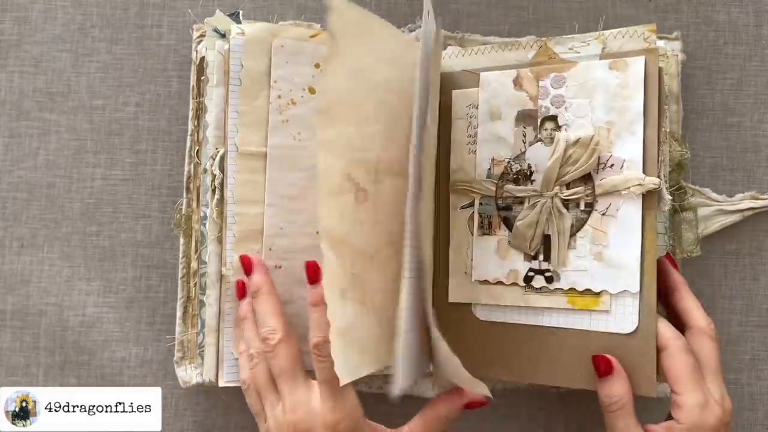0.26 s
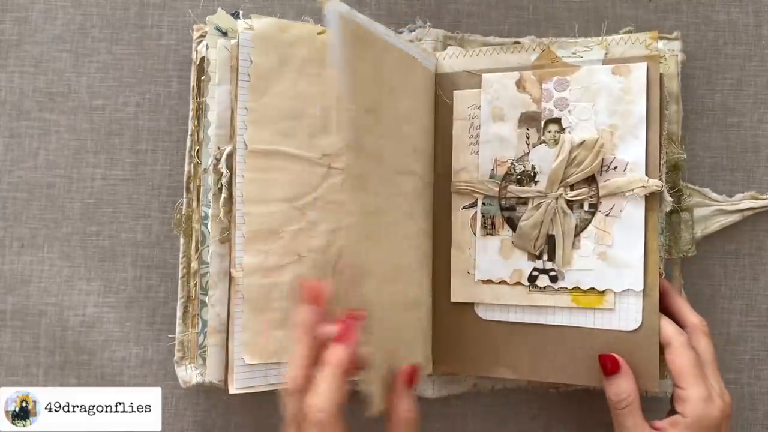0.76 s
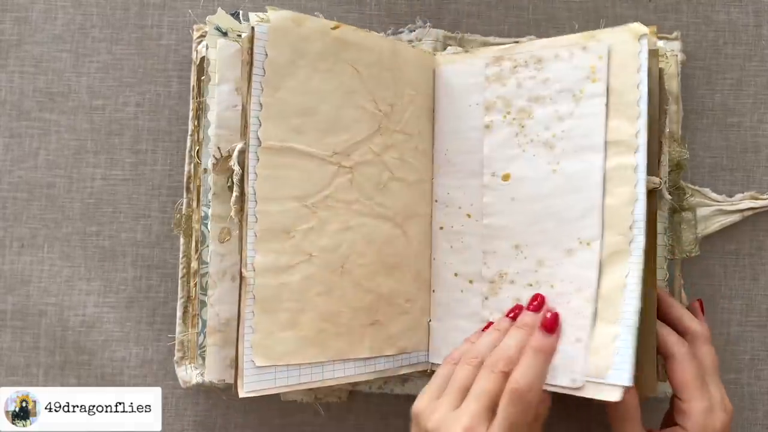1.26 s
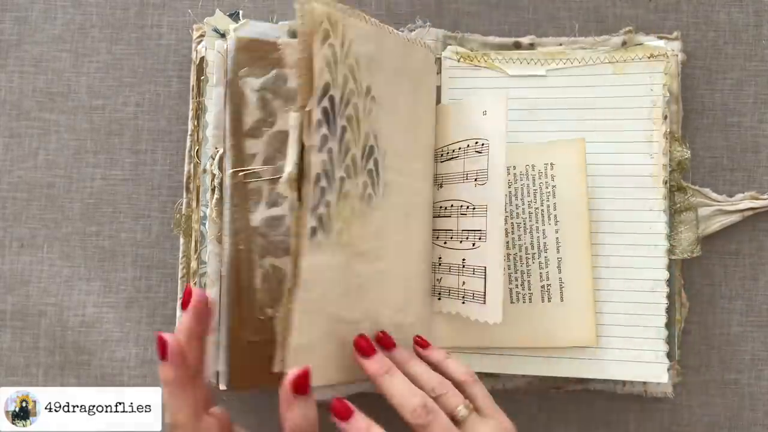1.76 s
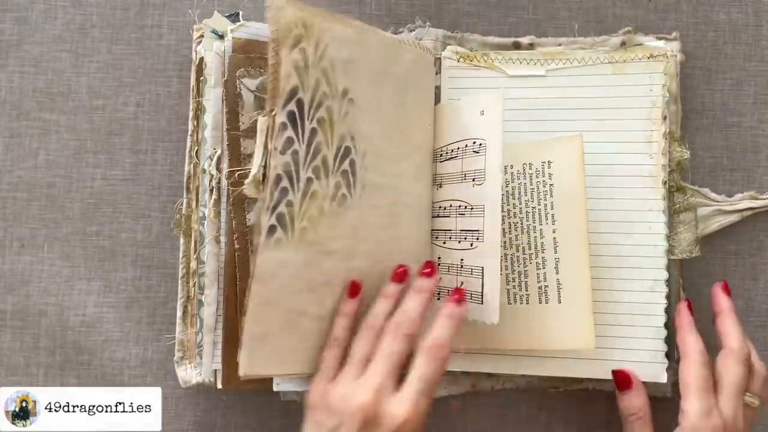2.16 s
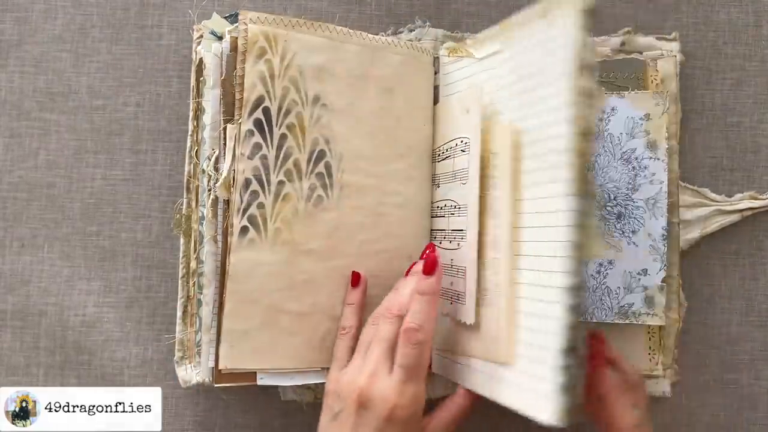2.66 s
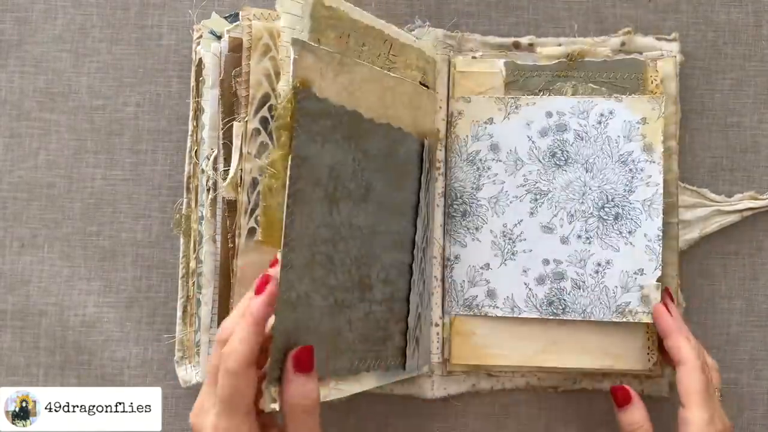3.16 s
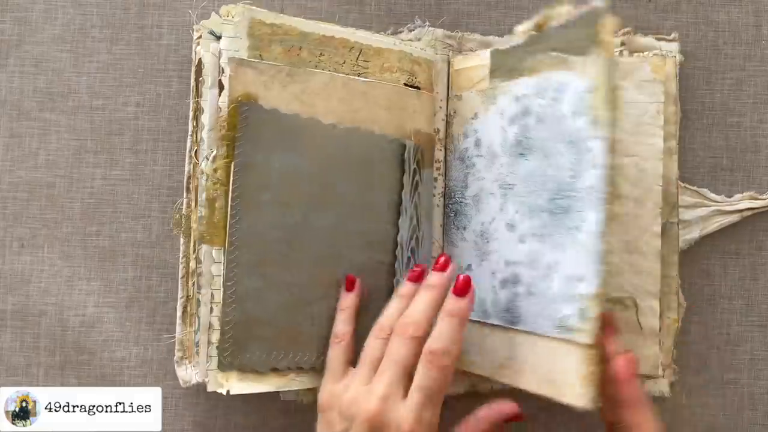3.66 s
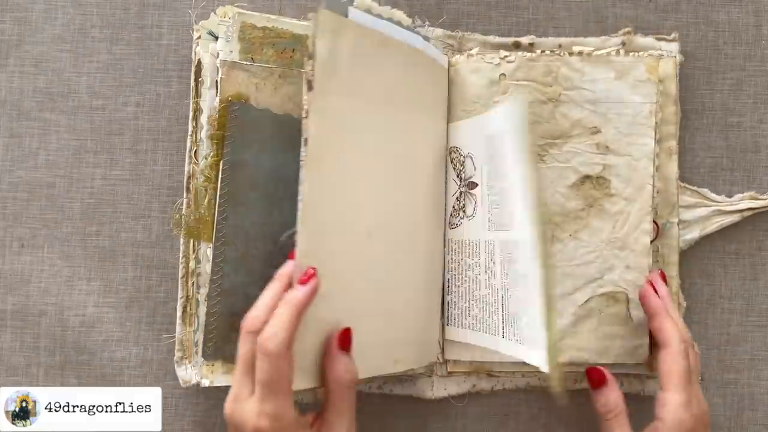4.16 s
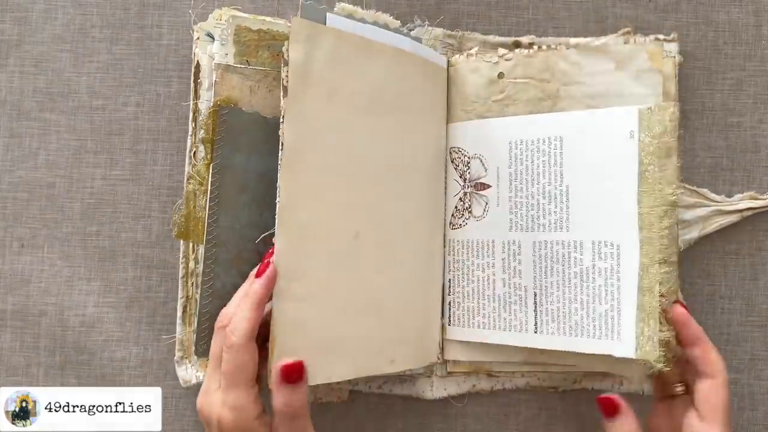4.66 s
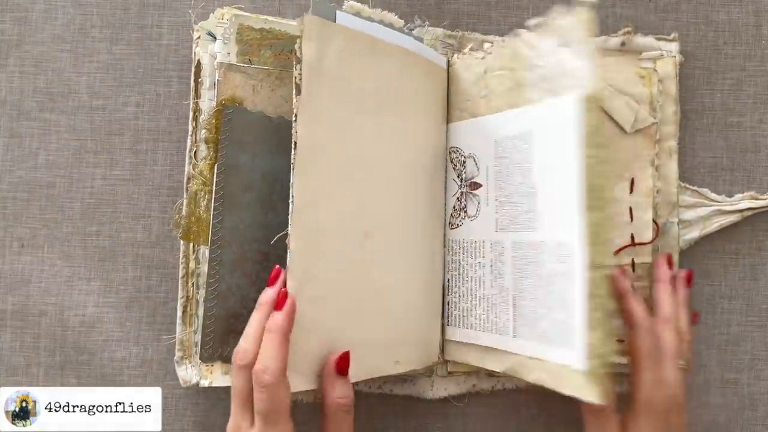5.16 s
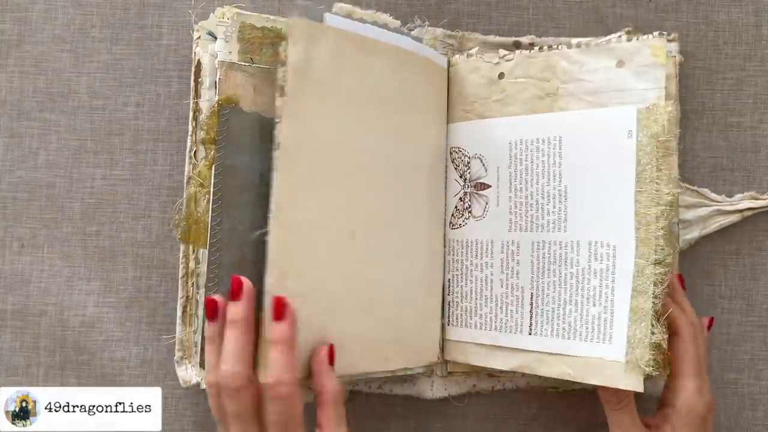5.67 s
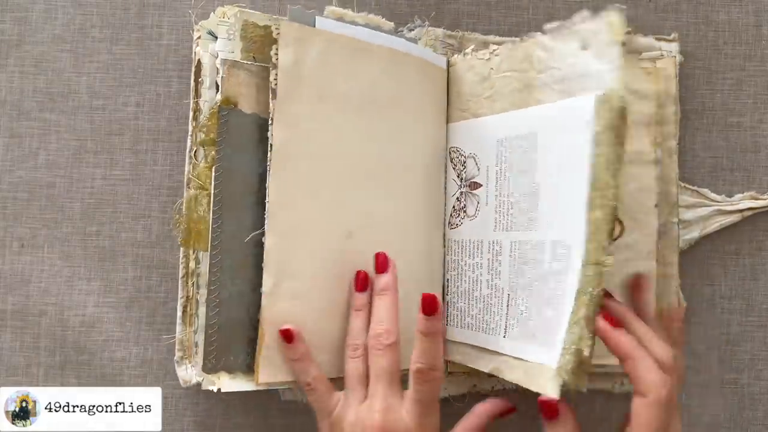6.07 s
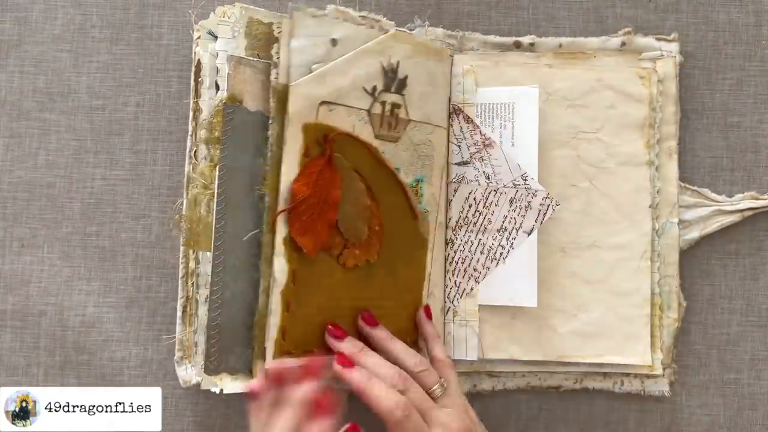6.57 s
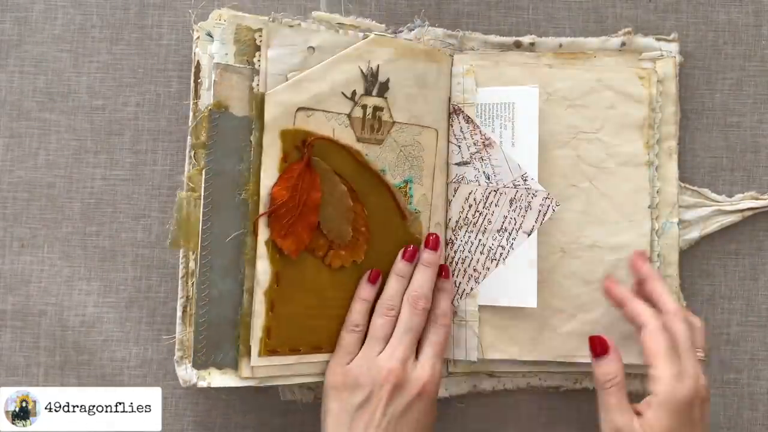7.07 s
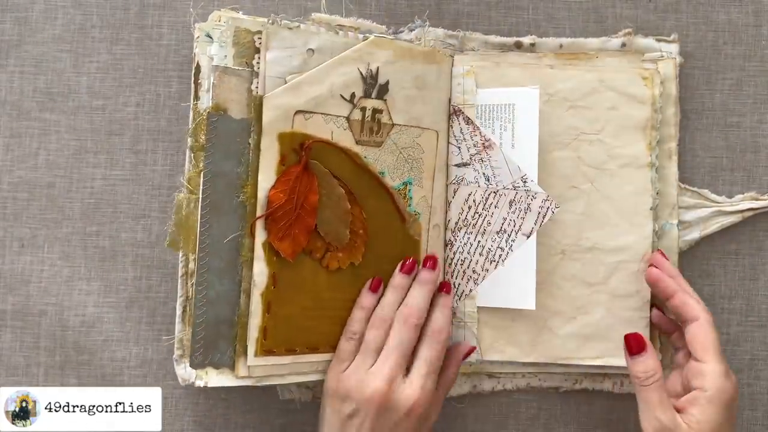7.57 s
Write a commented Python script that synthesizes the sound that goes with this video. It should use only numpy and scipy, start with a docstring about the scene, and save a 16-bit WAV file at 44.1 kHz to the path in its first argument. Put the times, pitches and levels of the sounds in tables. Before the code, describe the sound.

Thick stiff pages are leafed by hand, with papery rustles, small crease crackles, a few sharp flicks and faint low table thuds.

```python
"""Thick, stiff pages of a handmade book are leafed while the cloth-covered table shudders low beneath them.
Rubbed paper is flickering bands of noise with small ringing creases, taut patches and pitched rubs.
Creases buckle as clicked resonances with a gritty crumple; nails and page edges flick as short ringing sines.
The table is a wavering tone under noise-driven modes. The paper gets a small soft room; a pair of
microphone ports close above sets the sides apart in phase, and the whole has a coloured, cut treble."""
import sys
import numpy as np
from scipy import signal
from scipy.fft import rfft, irfft, next_fast_len
from scipy.io import wavfile

SR = 44100
rng = np.random.default_rng(int(sys.argv[2]) if len(sys.argv) > 2 else 0)


def pcm_store(signal):
    """Save signal as 16-bit PCM."""
    levels = np.round(np.clip(np.atleast_2d(signal), -1, 1) * 32767)
    wavfile.write(sys.argv[1], SR, levels.astype(np.int16).T)


N = 344729

# Small room: decay and level of its sound, corner of the wall's treble loss
ROOM_T60_S, ROOM_DB, WALL_CUT_HZ = 0.3, -19, 3500

# Table shudder, its pitch rising while the book is pressed down:
# (time [s], pitch [Hz], lowest mode level [dB], upper modes level [dB])
SHUDDER = [(0.0, 48.1, -53.5, -63.5), (0.6, 49.1, -55, -58), (1.05, 49, -58, -61), (1.19, 49.5, -68, -64),
           (1.32, 48.6, -54, -66), (1.38, 52, -64, -60), (1.52, 59.8, -61, -52.5), (1.66, 55.2, -43, -58),
           (1.79, 51.9, -48, -53), (1.9, 52.7, -38, -59), (2.13, 54.1, -37, -50.5), (2.18, 54, -51, -50),
           (2.28, 56.9, -68, -53), (2.5, 58.8, -59, -64), (2.62, 54, -65, -61.5), (2.87, 54.8, -64, -62),
           (3.05, 49, -59.5, -61.5), (4.4, 48.8, -53.5, -62.5), (4.8, 49.3, -48.5, -54),
           (5.1, 50, -57, -65), (5.19, 50, -56, -60), (5.24, 49, -46, -61), (5.33, 48.5, -46.5, -68),
           (5.55, 49.6, -59, -58.5), (5.68, 48.7, -52, -62), (5.75, 49.2, -56, -62),
           (5.82, 49.8, -49.5, -60.5), (6.3, 49.8, -53.5, -56), (6.45, 49.8, -48, -54),
           (6.72, 49.5, -60, -66.5), (6.77, 49.2, -54, -57), (6.83, 49, -64, -67), (6.95, 48.8, -55, -61.5),
           (7.2, 48.4, -63, -62), (7.82, 49.6, -61, -66)]
# Upper modes of the table: (pitch [Hz], width [Hz], level [dB])
TABLE_MODES = [(64, 15.4, 2), (97.6, 12.4, 3.5), (115, 16.2, -1), (134.9, 29.7, -6.5)]
# The book jolts the table: (time [s], lowest mode swell [dB], upper modes swell [dB])
JOLTS = [(0.13, -55, -77), (0.3, -49, -62), (0.93, -56, -63), (1.07, -54, -73), (1.43, -35.5, -46),
         (1.59, -53, -72), (1.68, -57, -44), (1.705, -34, -60), (1.76, -60, -45), (1.846, -35, -75),
         (1.95, -46, -50), (1.979, -32.5, -54), (2.04, -64, -51), (2.07, -49, -63), (2.22, -39, -68),
         (2.33, -51, -76), (2.59, -50.5, -67), (2.978, -70, -62), (3.017, -70, -55), (3.07, -63, -55),
         (3.72, -53, -67), (4.72, -58.5, -71), (4.765, -61, -38), (4.81, -49, -71), (5.01, -62, -59),
         (6.06, -67, -55), (7.31, -50, -89), (7.661, -54, -65)]
JOLT_RISE_S, JOLT_FALL_S = 0.015, 0.018   # bell-curve spreads before and after the peak
OCTAVE_DB = -17   # second harmonic against the shudder's fundamental

# Sliding paper; the last three columns are against the paper's own colour:
# (time [s], hiss level [dB per octave], whole-sheet flap [dB], stiff rasp [dB], fine fibres [dB])
SLIDE = [(0.0, -78, 16, 15, 10), (0.06, -65, 3, 6, 22), (0.19, -60.5, 3.5, 9, -4),
         (0.26, -59.5, 7.5, 3, 11.5), (0.35, -60, 7, 8, 3), (0.46, -55, 4, 0.5, 5.5),
         (0.54, -56.5, -1, 12, 3), (0.6, -56, 6, -1, 6), (0.65, -59.5, 10.5, 10, 6),
         (0.675, -50.5, 0, 6, 4.5), (0.7, -53.5, 4, 4, 3), (0.72, -63, 10, 15, 7),
         (0.745, -60.5, 14, 12, 11), (0.83, -52.5, -13, -7, 6), (0.93, -55.5, -6, -10, 10),
         (0.945, -60, -4, -5, 12), (1.07, -60.5, -7, 6.5, 2.5), (1.085, -65, 0, 5, 4),
         (1.13, -71.5, 2.5, 3, 8.5), (1.255, -67.5, 0, 3, 1), (1.28, -57, -3.5, -2.5, 8.5),
         (1.44, -55.5, 4, 5, 7.5), (1.5, -57.5, -24, 2.5, 10), (1.63, -64, -2, 4.5, 18),
         (1.66, -53.5, 1.5, 15, 12), (1.685, -53.5, -5, -2, 11.5), (1.715, -53.5, -8, 0, 10.5),
         (1.742, -52, -2, 0, 5), (1.765, -52.5, 1, 5, 5), (1.785, -59, 3, 6, 3), (1.805, -50.5, -6, 6, 3),
         (1.825, -53, 5, 4, -7), (1.84, -59.5, 4, 1, 0), (1.91, -62, -5, -3.5, 8), (2.07, -72.5, 6, 8, 17),
         (2.11, -60, 6, 12, 14), (2.135, -60, 0, 5, 9), (2.16, -53.5, 0, 5, 16.5),
         (2.2, -57.5, -8, 9, 20.5), (2.225, -57, -5, 5, 14), (2.245, -56.5, 3, 14, 13),
         (2.28, -55, -5, -3, 9), (2.295, -63, -3, 7, 6), (2.315, -62.5, -3, 11, 5), (2.333, -68, 6, -1, 7),
         (2.35, -65, -9, 14, 7), (2.4, -71.5, 5, 1, 2), (2.48, -77, 9, 10, 10), (2.53, -68, 8.5, 6, -4),
         (2.63, -59, -8.5, 1, 10.5), (2.74, -68, 2.5, 6, 9), (2.85, -57, -9, -1, 9.5),
         (2.92, -54, -11, -9, 12), (2.98, -51.5, 7, -11, 5.5), (3.02, -52.5, 7.5, -9, 8),
         (3.065, -54.5, -8, -11, 4), (3.08, -55, 4.5, -2, 4), (3.18, -59, -8, -4, 4.5),
         (3.26, -60.5, -3, 7, 10), (3.44, -60, 0, 7, 9.5), (3.55, -54, -4.5, 5.5, 11),
         (3.66, -56.5, -14, 1, 10), (3.7, -54, 4.5, 4, 6), (3.76, -57.5, -1, 3, 7),
         (3.87, -60, -3.5, 8.5, 9.5), (4.01, -53, 0.5, 8.5, 12.5), (4.14, -59.5, -8, 8, 4.5),
         (4.24, -59.5, -3.5, 10, 7), (4.37, -69.5, 8, 8, 10.5), (4.48, -67, -3, 1, 7),
         (4.52, -62, 12, 16, 6.5), (4.57, -55.5, 3.5, 10, 4), (4.61, -46.5, 4, 12, 13),
         (4.64, -51, -1, -5, 0), (4.663, -50.5, -3, -4, 1), (4.69, -50.5, -5, 9, -2),
         (4.715, -45, 0, 15, 1), (4.73, -52, -14, -3, 10), (4.745, -38, -10, 3, 3),
         (4.755, -44.5, -8, 11, -7), (4.78, -48.5, -8, 17, 5), (4.83, -52, 0, -1, 7),
         (4.855, -55.5, 1, 3, 9), (4.875, -59, 11, 15, 15.5), (4.9, -59, 8, 6, 17),
         (4.92, -56.5, 9.5, 16, 17), (4.94, -58.5, 11, 11, 13.5), (4.965, -62.5, 6, 2, 2),
         (4.972, -66, 6, 2, 7), (4.98, -58.5, -2, 5, 21.5), (5.0, -60.5, 0, 4, 12.5),
         (5.05, -67, -1, 3.5, 9.5), (5.18, -69, 3, 8, 4), (5.22, -63, 6, 9.5, 10.5),
         (5.31, -61.5, 1, 12, 8.5), (5.36, -70.5, 8, 10, 0), (5.42, -57, -4, 6, -1),
         (5.53, -66.5, -5, 6, 7), (5.58, -57, -5, 2, 1), (5.66, -65, -0.5, 9.5, 6),
         (5.73, -59, -3, 8.5, -11), (5.79, -49.5, -11, 4.5, 13), (5.9, -55, 1.5, 2, 0),
         (5.97, -56.5, 2.5, 10, 4.5), (6.0, -51.5, 1, 5, 5), (6.025, -41, -12, -2, 1),
         (6.045, -42, -9, -2, 4), (6.065, -48, -4, -4, 5), (6.12, -57.5, 6.5, -1, 11.5),
         (6.2, -60, -2, -1, 10), (6.29, -71.5, 6, 11, 15), (6.365, -66.5, 13, 9, 9.5),
         (6.4, -59.5, 6, -6, 8), (6.43, -57, -8, 2, 14), (6.465, -57.5, -3, -1, 5),
         (6.49, -54.5, 0, 10, 9.5), (6.525, -63, 2, 14, 11), (6.55, -68, -2, 8, 14), (6.59, -68, 3, 15, 15),
         (6.62, -72, 8, 13, 16), (6.66, -74, 9, 1, 7), (6.7, -78.5, 16, 27, 21.5),
         (6.79, -60, -7.5, 4.5, 16), (6.87, -61, -3, 6, 12), (6.91, -60.5, -3, 5, 14),
         (6.99, -66, 6, 12, 8), (7.08, -67, 4, 9, 9), (7.12, -61.5, -0.5, 6.5, 9), (7.19, -72, 6, 12, 4),
         (7.25, -70.5, 6, 10, 4), (7.29, -77, 15, 9, -1), (7.32, -66, 9.5, 11.5, 10),
         (7.47, -64, -3.5, 0, 11), (7.52, -59.5, -5, 0, 8), (7.64, -57, 6, 8, 15),
         (7.69, -58.5, 3.5, 6.5, 13.5), (7.74, -54, -7, 4, 14), (7.765, -53.5, 3, 1, 18),
         (7.79, -47.5, -3, -8, 13.5), (7.805, -53, -2, 2, 7), (7.82, -55, -4, -8, 6)]
# Centres of the registers: flap, rasp, hiss and fibres [Hz]
REGISTER_HZ = [500, 1700, 5000, 9000]
# Colour of rubbed paper: (frequency [Hz], level [dB])
PAPER_COLOUR = [(160, -2.5), (300, 4.5), (600, 5.5), (900, 4), (1200, 1), (1750, 9.5), (2300, 6.5),
                (4000, 12.5), (7000, 12), (10000, 0)]
# How alike the slide is on both sides: (frequency [Hz], left-right likeness [0 to 1])
LIKENESS = [(100, 1), (300, 0.82), (1000, 0.82), (2500, 0.87), (5000, 0.091), (7000, 0.26), (8500, 1),
            (10300, 1), (13000, 0.54)]

# Taut patches: level against the hiss, width in parts of the pitch, depth of the swing
PATCH_DB, PATCH_WIDTH, PATCH_SWING_DB = -16.5, 0.11, 7.5
# A taut sheet is rubbed and rings at one pitch: # (time [s], length [s], level at the top of the swell [dB
# rms], pitch [Hz])
RUBS = [(0.101, 0.1, -60.5, 990), (0.217, 0.067, -55, 1040), (0.312, 0.1, -56.5, 990),
        (0.349, 0.049, -60, 2050), (0.235, 0.13, -59, 1850), (0.441, 0.069, -56, 1000),
        (0.458, 0.049, -60, 1950), (0.542, 0.036, -45, 4960), (0.875, .03, -54, 4100),
        (0.655, 0.035, -60, 3000), (0.673, 0.028, -51.5, 1120), (1.49, 0.09, -58.5, 1830),
        (1.658, .035, -56, 4400), (2.098, 0.018, -50, 2340), (2.108, .018, -50, 1700),
        (2.144, .04, -48, 5740), (2.193, .04, -52, 5650), (2.23, 0.05, -55, 4000), (2.266, 0.04, -54, 2060),
        (2.336, 0.038, -66, 2910), (2.941, 0.072, -56, 1860), (3.005, 0.04, -64, 300),
        (3.386, 0.036, -66, 1950), (3.52, 0.046, -61, 1880), (4.182, 0.064, -55, 1680),
        (4.297, 0.055, -60.5, 1645), (4.429, 0.027, -58, 5500), (4.704, 0.012, -44, 855),
        (4.769, 0.0119, -38, 754), (4.781, 0.013, -43, 800), (4.791, 0.015, -43, 530),
        (4.849, 0.037, -49, 603), (5.088, 0.06, -62, 3120), (5.202, 0.007, -42, 795),
        (5.231, .02, -57.5, 2600), (5.416, 0.021, -51, 3300), (5.42, 0.033, -51, 2750),
        (5.432, 0.02, -57, 1400), (5.459, .025, -62, 1120), (5.681, 0.02, -60, 4300),
        (5.96, 0.027, -51, 1604), (6.002, 0.017, -45.5, 802), (6.045, 0.016, -51, 805),
        (6.779, 0.066, -58, 1600), (6.898, 0.039, -58, 1734), (7.228, 0.037, -64, 2224),
        (7.333, 0.031, -64, 750), (7.768, 0.024, -47, 6500)]
RUB_WIDTH, RUB_RISE = 0.12, 0.17   # width in parts of the pitch; share of the length spent rising
CRINKLE_DB, CRINKLE_TILT_DB = 0, 2   # level against the hiss; tilt per octave about 2 kHz

# Clean flicks of a nail or page edge: (time [s], peak [dB], pitch [Hz], t60 [s], second mode pitch [Hz],
# second mode against the peak [dB], left minus right [dB])
FLICKS = [(0.2003, -24.5, 1750, 0.0059, 2680, -9, -2.5), (0.7318, -29.5, 930, 0.0069, 1500, -12, 0),
          (1.3722, -27, 1740, 0.0075, 3100, -6, -2), (1.4505, -45.5, 790, .02, 3600, 0, 0),
          (4.012, -33, 3020, .012, 6000, -15, 0), (4.033, -33, 3870, .01, 1300, -6, -2),
          (2.992, -40, 786, 0.012, 503, -2, 0), (3.0255, -42, 1600, 0.011, 3800, 4, 0),
          (4.6815, -20.5, 2700, 0.0084, 4540, -1, -1), (4.693, -32, 3430, 0.018, 2190, 5, -4),
          (4.6992, -8.5, 4200, 0.0057, 2260, -7.5, -6), (4.702, -14.5, 4270, 0.0072, 2370, 1, -2),
          (4.7475, -18.5, 2530, 0.019, 604, -11.5, -3), (4.8625, -33, 2795, 0.013, 750, -5, -1),
          (4.973, -46, 3350, .008, 6980, -16, 1), (5.1988, -35, 887, 0.0079, 2710, 4, 2),
          (5.5965, -40.5, 695, 0.018, 1130, 1, -5), (6.3222, -29.5, 650, 0.015, 2630, -13, 2),
          (6.4222, -30, 2040, 0.006, 3350, -9, 3), (6.4615, -45, 2784, 0.011, 4440, -2, 4),
          (7.5032, -37, 1600, 0.0057, 4450, 4, 3), (7.5473, -42.5, 600, 0.011, 4460, 8, 0)]
FLICK_SWELL = 0.36   # cycles over which the push builds
OVERTONE_DAMPING = 0.4   # t60 goes with pitch to minus this power
TICK_DB, TICK_S = -14, 0.00032   # broad tick against the peak; its decay time

# Creases buckling: (time [s], main mode peak [dB], pitch [Hz], crumple t60 [s], knock against the peak [dB],
# crack against the peak [dB], left minus right [dB])
SNAPS = [(0.121, -43, 4330, 0.017, -23, 2, 0), (0.204, -38.5, 1770, 0.034, -0.5, -20, -4),
         (0.31, -42.5, 840, 0.017, 4.5, -20, 0), (0.418, -41, 1014, 0.035, 3, -15, 3),
         (0.421, -40, 2100, 0.02, -20, -20, 3), (0.515, -38, 5000, 0.31, 1.5, 2.5, -2),
         (0.547, -31.5, 6550, 0.062, -35, -1, 12), (0.555, -22.5, 4870, 0.019, -36, 1.5, -2.5),
         (0.575, -34.5, 1200, 0.023, -2, -15, 2), (0.622, -36, 1400, 0.035, -15, -29, 4),
         (0.724, -44, 5860, 0.019, 2, -8, 0), (1.651, -40.5, 1540, 0.029, -5, -9, 4.5),
         (1.761, -40, 1940, 0.03, -4, -8, 3), (1.808, -33, 5200, 0.01, -30, -4.5, 1),
         (1.81, -28, 2550, 0.011, -6.5, -12, 2.5), (2.106, -43, 2330, 0.034, -5, -5, 5),
         (2.117, -38.5, 1680, 0.032, -24, -3.5, 6), (2.153, -36, 6340, 0.15, -36, -6, 2),
         (2.231, -53, 3840, 0.046, -14, -3, 8), (2.28, -41, 2130, 0.035, -31, -8, 0),
         (2.337, -44.5, 1810, 0.052, -32, -10, 1), (3.013, -39, 3450, 0.013, -21, -7, 0),
         (2.513, -48.5, 3080, 0.26, -24, -13, -1), (2.55, -55.5, 1533, 0.034, 6, -17, 3),
         (2.94, -35.5, 1640, 0.049, -9, -7, 1), (2.985, -38, 1860, 0.028, -1.5, -9, 0),
         (3.026, -35.5, 5700, 0.012, -29, -8, 4), (3.072, -47, 1520, 0.032, -1, -15, -2),
         (3.1604, -42.5, 5800, 0.0096, -25, 0, 3), (3.245, -41, 1754, 0.021, -15, -15, 2),
         (3.256, -45, 3000, 0.011, -21, 1, 2), (3.282, -33, 4580, 0.0038, -18, -10, -1),
         (3.315, -47, 1720, 0.015, -17, -17, 0), (3.329, -36, 4730, 0.011, -4.5, -7, 0),
         (3.363, -41.5, 3250, 0.021, -26, -22, 4), (3.39, -48, 2020, 0.022, -28, 1, 5),
         (3.411, -46, 5730, 0.016, -21, 6, 3), (3.684, -40, 4330, 0.0057, -25, -8, -2),
         (3.694, -42, 1600, 0.014, -1, -12, 0), (3.923, -44, 5000, 0.0064, -25, -1, 0),
         (3.986, -43, 605, 0.056, -8, -25, 0), (4.0325, -36, 6000, 0.0054, -4, 2, -2),
         (4.396, -49, 1290, 0.058, 2.5, -20, 0), (4.495, -38.5, 1885, 0.03, 1.5, -45, -3),
         (4.522, -43, 696, .04, -5, -18, -3), (4.578, -13.5, 6340, 0.022, -23, -10, 0.5),
         (4.607, -22.5, 2490, 0.039, -5.5, -25, -3), (4.623, -26, 1340, 0.02, -26, -33, 0),
         (4.668, -35, 1010, 0.018, -21, -7, 0), (4.682, -24, 2580, 0.034, -12, -19, 1),
         (4.692, -22.5, 3426, 0.039, -5, -20, 2), (4.699, -25.5, 6900, 0.014, -3, 6.5, -4),
         (4.704, -29.5, 4400, 0.14, -36, -22, 11), (4.748, -26, 1420, 0.026, 2, -5, -1),
         (4.758, -31, 5000, 0.014, -20, -11, -2), (4.767, -24, 2945, 0.025, -3.5, -20, -1),
         (4.864, -34, 2120, 0.032, -1, -11.5, 1), (4.874, -38, 1400, 0.024, 2, -8, 2),
         (4.911, -42, 1500, 0.035, -5, 0, 0), (4.919, -36, 710, .035, -11, -9, 2),
         (4.973, -45, 3220, 0.023, 4, 9.5, 2), (5.1982, -35.5, 4000, 0.013, -4, -0.5, 2),
         (5.315, -49, 800, 0.028, -7, -20, -1), (5.435, -52, 599, 0.03, -23, -31, 3),
         (5.482, -45, 3010, 0.013, -20, -7, 0), (5.55, -39.5, 1690, 0.012, -4.5, -5, 2),
         (5.608, -42.5, 1490, 0.019, 0.5, -6, 0), (5.724, -46, 3520, 0.0091, -20, -8, 0),
         (5.758, -40.5, 3550, 0.028, -4, -12, 0), (5.765, -46.5, 1285, 0.061, 3.5, -15, 0),
         (5.785, -35.5, 6800, .012, -30, -6, -2), (5.912, -37, 2380, 0.055, -9, -18, -1),
         (5.938, -39.5, 2300, .02, -18, -7, 0), (6.047, -31.5, 4500, .015, -20, -3, -3),
         (6.209, -50, 6000, 0.0051, -30, -3, 0), (6.214, -52, 6000, .005, -30, -3, 0),
         (6.228, -43, 1490, 0.025, 1.5, -31, 2.5), (6.315, -47.5, 680, .03, -3, -22, 9),
         (6.346, -52, 3400, 0.0085, -30, -8, 0), (6.37, -45, 1100, 0.021, 7.5, -25, 2),
         (6.424, -40, 3000, 0.024, -4, 0, 2), (6.437, -38, 954, 0.021, -24, -18, 2),
         (6.473, -47, 667, 0.1, -21, 5.5, 0), (6.705, -47, 1690, 0.06, -39, -7, 0),
         (6.88, -52, 684, 0.12, 9, 7, 0), (6.882, -50, 273, 0.04, -10, -30, 2),
         (7.017, -47, 501, 0.026, -8, -25, 0), (7.028, -44.5, 1636, 0.03, -3, -15, -1),
         (7.031, -48, 385, .04, -15, -30, 0), (7.311, -44, 656, 0.032, -37, -9, -2),
         (7.314, -47.5, 3000, 0.013, -13, -5, 0), (7.33, -46, 2200, 0.011, 1, -8, -1),
         (7.503, -38, 2530, 0.0087, -19, 6, 1), (7.5465, -39, 3520, 0.0093, -4, -5, 0),
         (7.724, -50, 1990, .02, -6, 0, 0), (7.747, -40.5, 1000, .02, -8, -3, -1),
         (7.753, -39, 4500, 0.019, -9, -6, 1), (7.787, -40, 1500, 0.034, -0.5, 1, 0)]
# Creases that roll over gradually: (time [s], main mode peak [dB], pitch [Hz], crumple t60 [s],
# knock against the peak [dB], crack against the peak [dB], left minus right [dB])
SCUFFS = [(0.905, -39, 8150, .1, -25, 0, -1), (5.82, -31.5, 3120, 0.036, -9, -11, -1),
          (6.006, -29, 2130, .08, -10, -12, -2), (1.746, -35.5, 8450, .035, -13, -4, 2),
          (1.797, -38.5, 4500, .04, -20, -6, 2), (2.298, -42, 4730, 0.031, -30, 2, 0),
          (2.336, -47, 4660, 0.032, -30, -8, 0), (6.41, -41.5, 5500, 0.055, -30, -2, -5),
          (0.759, -35.5, 4630, 0.042, -8, 2, 1), (0.763, -37, 1880, 0.026, -9, -10, -3),
          (3.784, -40, 3450, 0.044, -10.5, 1, 3), (3.972, -31.5, 6270, 0.052, -28, -13, 0),
          (4.037, -37, 3670, 0.064, -9, 2, -1), (4.081, -36, 2540, 0.04, -30, 0, 0),
          (5.296, -38, 2600, 0.042, -4, -10, 1), (5.39, -43, 1535, 0.051, -10, -4, 2),
          (5.538, -41, 1700, 0.042, -10, 0, 3), (5.594, -39, 5020, .03, -25, -9, 0),
          (7.531, -45, 8000, 0.017, -30, 1, 0)]
SCUFF_RISE, SCUFF_CLICK_DB = 0.17, -25   # rise time in parts of the t60; what is left of the click
# Knock, body and crack of a sheet: (pitch [Hz], width [parts of the pitch], decay [parts of the t60])
SHEET_MODES = [(610, 0.93, 2.53), (2510, 1.82, 1.8), (8470, 1.54, 0.91)]
BODY_DB, BODY_FOLLOWS = -0.5, 0.27   # body mode against the peak; share of the crack's dB added to it
CRUMPLE_DB, CLICK_TILT_DB = 2.5, 0   # crumple against the click; click tilt per octave about 2 kHz

# Phase between the microphone ports: (frequency [Hz], lead of the left port [rad])
PORT_PHASE = [(0, 0), (1900, .07), (2950, 1), (3450, .95), (4300, .23), (5600, .23), (7500, .9), (8600, 0),
              (9900, -2.8), (10250, -np.pi), (10500, -3.4), (11630, -5.93), (12060, -2 * np.pi),
              (12500, -6.55), (13350, -9.42), (14200, -9.46), (14700, -12.4), (16000, -12.5)]
# Treble colour of the whole sound, a peak near 10.5 kHz, dull above 12.5 kHz: (frequency [Hz], level [dB])
TREBLE_COLOUR = [(20, -29), (40, -5), (7000, -0.5), (8600, 4), (10500, 14.5), (11200, 13), (12500, -4),
                 (13400, -21), (15500, -18)]
# Balance of the two ports: (frequency [Hz], left minus right [dB])
PORT_LEAN = [(60, 0), (180, 1), (550, 1.5), (1650, 0.0), (4970, 1.5), (15000, -1)]
CUTOFF_HZ = 16200   # everything above is at least 60 dB down


def from_db(db):
    """Decibels to gain."""
    return 10 ** (np.asarray(db) / 20)


def rms_one(x):
    """Scale to unit rms."""
    return x / np.sqrt(np.mean(x ** 2) + 1e-20)


def in_time(rows):
    """Columns of a curve at every sample."""
    times, *columns = np.transpose(rows)
    return [np.interp(np.arange(N) / SR, times, column) for column in columns]


def at_hz(points, hz):
    """A spectrum read on a log-frequency axis."""
    points = np.array(points, float)
    return np.interp(np.log(hz + 1), np.log(points[:, 0] + 1), points[:, 1])


def drift(rate_hz):
    """Random wander of spread 1: noise smoothed by two equal poles, made at every 40th sample."""
    r = np.exp(-2 * np.pi * rate_hz * 40 / SR)
    noise = rng.standard_normal(N // 40 + 2002)
    slow = signal.lfilter([1], [1, -2 * r, r * r], noise)[2000:]   # the filter has settled
    return np.interp(np.arange(N) / 40, np.arange(len(slow)), rms_one(slow))


def resonate(x, hz, width_hz):
    """A two-pole resonance of about unit gain at its top."""
    r = np.exp(-np.pi * width_hz / SR)
    top = np.array([1, 0, -1]) * (1 - r * r) / 2
    return signal.lfilter(top, [1, -2 * r * np.cos(2 * np.pi * hz / SR), r * r], x)


def left_right(pan_db):
    """Gains of the two sides, split evenly about the centre."""
    return from_db([[pan_db / 2], [-pan_db / 2]])


def room(x):
    """Six feedback delays a side, duller on every round."""
    size = next_fast_len(N + SR)
    hz = np.arange(size // 2 + 1) * SR / size
    spectrum = rfft(x, size)
    wall = 1 / (1 + 1j * hz / WALL_CUT_HZ)
    out = np.zeros((2, len(hz)), complex)
    for k, lag_s in enumerate(rng.uniform(0.0074, 0.026, 12)):
        loop = from_db(-60 * lag_s / ROOM_T60_S) * wall * np.exp(-2j * np.pi * hz * lag_s)
        sign = (-1) ** (k // 2)
        out[k % 2] += sign * spectrum * loop / (1 - loop)
    return irfft(out, size)[:, :N]


def shudder(waver_hz, waver_db):
    """The lowest table mode rings almost as a tone; the upper ones are shaken at random; jolts swell both."""
    hz, low_db, upper_db = in_time(SHUDDER)
    low_gain = from_db(low_db + waver_db * drift(29))
    upper_gain = from_db(upper_db + waver_db * drift(6.7))
    for s, low_jolt_db, upper_jolt_db in JOLTS:
        at = round(s * SR)
        near = np.arange(max(at - SR // 8, 0), min(at + SR // 8, N))
        spread_s = np.where(near < s * SR, JOLT_RISE_S, JOLT_FALL_S)
        swell = np.exp(-.5 * ((near / SR - s) / spread_s) ** 2)
        low_gain[near] += from_db(low_jolt_db) * swell
        upper_gain[near] += from_db(upper_jolt_db) * swell
    phase = 2 * np.pi * np.cumsum(hz + waver_hz * drift(8.2)) / SR
    octave = from_db(OCTAVE_DB + waver_db * drift(15.0)) * np.sin(2 * phase)
    tone = np.sqrt(2) * (np.sin(phase) + octave)
    white = rng.standard_normal((3, N))
    upper = 0
    for mode_hz, width_hz, db in TABLE_MODES:
        ring = resonate(resonate(white, mode_hz, width_hz), mode_hz, 3 * width_hz)
        upper = upper + from_db(db) * ring
    upper = rms_one(upper[0] + 0.4 * upper[1:])   # mostly alike on both sides
    return tone * low_gain + upper * upper_gain


def patches(rate_hz):
    """Taut parts of a rubbed sheet ring at their own pitch for a moment, then slacken."""
    white = rng.standard_normal(N)
    rings = 0
    for hz in np.geomspace(700, 8000, 14):
        colour_db = at_hz(PAPER_COLOUR, hz) - at_hz(PAPER_COLOUR, REGISTER_HZ[2])
        swing_db = PATCH_SWING_DB * np.minimum(drift(rate_hz), 2.2)
        rings = rings + from_db(colour_db + swing_db) * rms_one(resonate(white, hz, PATCH_WIDTH * hz))
    return from_db(in_time(SLIDE)[0] + PATCH_DB) * rings


def rubs():
    """A taut sheet rings as noise through a sharpened resonance, rising quickly and fading."""
    out = np.zeros(N + SR)
    for (s, length_s, db, hz), noise in zip(RUBS, rng.standard_normal((len(RUBS), SR // 4))):
        ring = rms_one(resonate(resonate(noise, hz, RUB_WIDTH * hz), hz, 2 * RUB_WIDTH * hz))
        progress = np.arange(len(noise)) / SR / length_s
        shape = np.interp(progress, [0, RUB_RISE, 1, 1.5], [0.24, 1, 0.77, 0.026])
        out[round(s * SR):][:len(noise)] += from_db(db) * shape * ring
    return out[:N]


def crinkles(per_s, spread_db, cycles):
    """Small creases give way at random, more as the sheets move faster, and ring at one of 12 pitches."""
    hiss_db = in_time(SLIDE)[0]
    sizes = from_db(spread_db * np.minimum(rng.exponential(1, N), 3.1)) * rng.choice([-1, 1], N)
    busy_db = .3 * (hiss_db + 60) + 6 * drift(10)   # the hiss stands for the speed
    born = rng.random(N) < per_s * from_db(busy_db) / SR
    pitch_of = rng.integers(0, 12, N)
    rings = 0
    for k, hz in enumerate(np.geomspace(600, 7000, 12)):
        clicks = sizes * born * (pitch_of == k) + 1e-18   # the trace keeps the filter out of denormals
        tilt = from_db(CRINKLE_TILT_DB * np.log2(hz / 2000))
        rings = rings + resonate(clicks, hz, hz / cycles) * np.sqrt(SR / hz) * tilt
    return from_db(hiss_db + CRINKLE_DB) * rings


def slide(patchy_db, jerk_db):
    """Fibres rubbing give noise in half-octave bands, each flickering on its own."""
    hiss_db, flap_db, rasp_db, fibre_db = in_time(SLIDE)
    registers_db = [flap_db, rasp_db, 0, fibre_db]
    white = rng.standard_normal((2, 2, N))   # neighbouring bands use different noise
    edges = 160 * 2 ** np.arange(0, 7, .5)
    out = 0
    for k, (low, high) in enumerate(zip(edges, edges[1:])):
        band = signal.butter(2, [low, high], "band", fs=SR, output="sos")
        mid, side = signal.sosfilt(band, white[k % 2])
        hz = np.sqrt(low * high)
        level_db = hiss_db + at_hz(PAPER_COLOUR, hz) - at_hz(PAPER_COLOUR, REGISTER_HZ[2])
        for only_one, register_db in zip(np.eye(4), registers_db):
            share = np.interp(np.log(hz), np.log(REGISTER_HZ), only_one)
            level_db = level_db + share * register_db
        band_norm = np.sqrt(8 * (high - low) / SR)   # leaves half the power of an octave in each band
        gain = from_db(level_db + patchy_db * drift(15)) / band_norm
        alike = np.clip(at_hz(LIKENESS, hz), 0, 1)
        out = out + gain * (np.sqrt(1 + alike) * mid + np.sqrt(1 - alike) * side * [[1], [-1]])
    return out * from_db(jerk_db * drift(41.0))   # the hand moves unevenly


def flicks():
    """One smooth push rings two short modes, the higher dying sooner, under a broad dry tick."""
    out = np.zeros((2, N + SR))
    t = np.arange(SR // 20) / SR
    noises = rng.standard_normal((len(FLICKS), len(t)))
    for (s, peak_db, hz, t60, second_hz, second_db, pan_db), noise in zip(FLICKS, noises):
        push = (1 - np.exp(-t * hz / FLICK_SWELL)) ** 2
        flick = from_db(TICK_DB) * np.exp(-t / TICK_S) * noise
        for mode_hz, db in [(hz, 0), (second_hz, second_db)]:
            swell = push * from_db(-60 * t / t60 * (mode_hz / hz) ** OVERTONE_DAMPING)
            flick = flick + from_db(db) * swell / swell.max() * np.sin(2 * np.pi * mode_hz * t)
        at = round(s * SR)
        out[:, at:at + len(t)] += from_db(peak_db) * flick * left_right(pan_db)
    return out[:, :N]


def snaps(click_s, rise_share, breadth, grit_db):
    """A buckle clicks its own pitch and the sheet's modes, then crumples; a scuff mostly crumples, slowly."""
    out, length = np.zeros((2, N + SR)), SR // 8
    t = np.arange(length) / SR
    click = np.exp(-t / click_s) / np.sqrt(click_s * SR)
    rows = [(*row, rise_share, 1) for row in SNAPS]
    rows += [(*row, SCUFF_RISE, from_db(SCUFF_CLICK_DB)) for row in SCUFFS]
    bursts = rng.standard_normal((len(rows), 4, length))
    grit = from_db(grit_db * drift(600))   # the crumple comes in lumps about a millisecond long
    for (s, peak_db, hz, t60, knock_db, crack_db, pan_db, rise, push), noises in zip(rows, bursts):
        at, snap = round(s * SR), 0
        lumps = np.resize(grit[at:at + length], length)
        modes = [(hz, breadth, 1), *SHEET_MODES]
        levels_db = [0, knock_db, BODY_DB + BODY_FOLLOWS * crack_db, crack_db]
        for noise, (mode_hz, width, lasts), db in zip(noises, modes, levels_db):
            rise_curve = 1 - np.exp(-t / (rise * t60))
            decay = from_db(-60 * t / max(lasts * t60, .004))
            crumple = 2 * from_db(CRUMPLE_DB) * np.sqrt(mode_hz / SR) * rise_curve * decay * noise * lumps
            # a push for the low modes, a spray of ticks for the high
            strike = push * click * (1 + noise) * from_db(CLICK_TILT_DB * np.log2(mode_hz / 2000))
            ring = resonate(crumple + strike, mode_hz, width * mode_hz)
            ring = resonate(ring, mode_hz, 2 * width * mode_hz)
            snap = snap + from_db(db) * ring / np.abs(ring).max()
        out[:, at:at + length] += from_db(peak_db) * snap * left_right(pan_db)
    return out[:, :N]


def scene():
    """Paper in a small soft room, over the table."""
    paper = slide(patchy_db=2.5, jerk_db=1.35)
    paper = paper + crinkles(per_s=330, spread_db=7.5, cycles=5.6)
    paper = paper + snaps(click_s=0.0002, rise_share=0.017, breadth=0.33, grit_db=3.5)
    paper = paper + flicks() + patches(rate_hz=16.0) + rubs()
    echoes = from_db(ROOM_DB) * room(paper.mean(axis=0))
    return paper + echoes + shudder(waver_hz=0.76, waver_db=2.0)


def record(dry):
    """The treble is coloured, the two ports turn it against each other in phase, and the top is cut."""
    size = next_fast_len(N + 4096)
    hz = np.arange(size // 2 + 1) * SR / size
    sides = np.array([[1], [-1]])   # half of each difference goes to each port
    gain = from_db(at_hz(TREBLE_COLOUR, hz) + at_hz(PORT_LEAN, hz) / 2 * sides)
    turn = np.exp(.5j * at_hz(PORT_PHASE, hz) * sides)
    x = irfft(rfft(dry, size) * gain * turn, size)[:, :N]
    return signal.sosfilt(signal.cheby2(14, 60, CUTOFF_HZ, fs=SR, output="sos"), x)


dry = scene()
out = record(dry)
pcm_store(out)
```